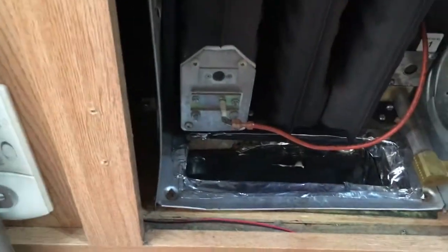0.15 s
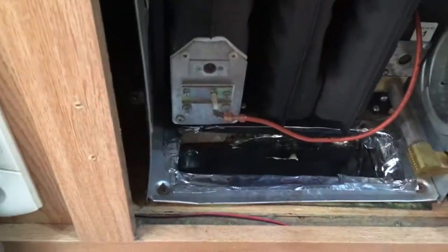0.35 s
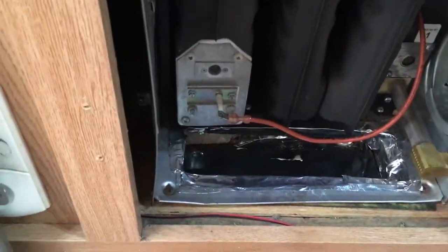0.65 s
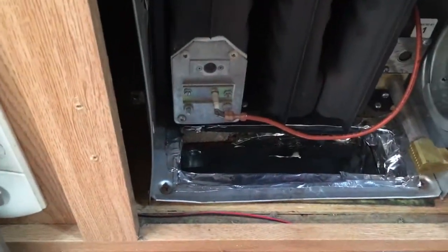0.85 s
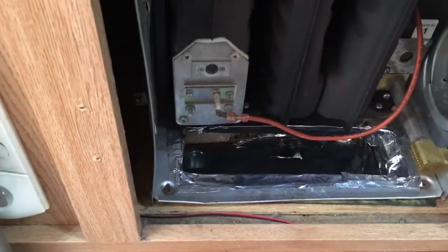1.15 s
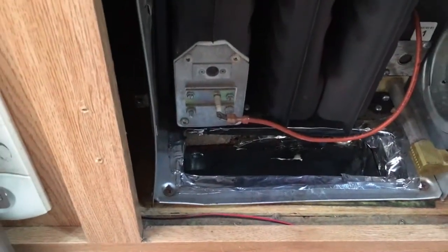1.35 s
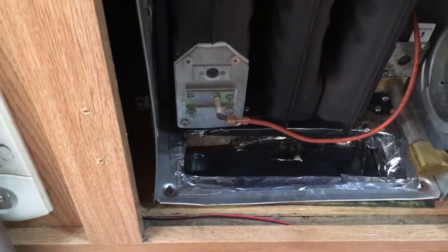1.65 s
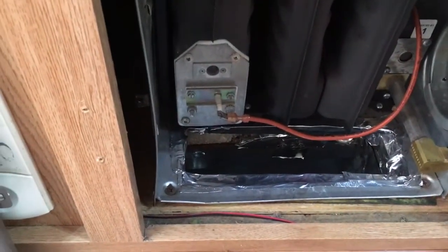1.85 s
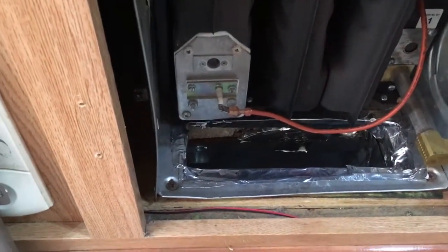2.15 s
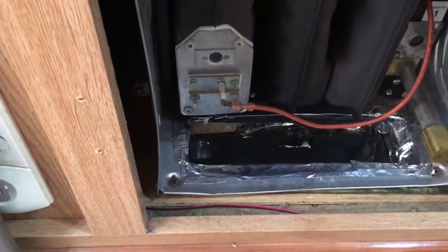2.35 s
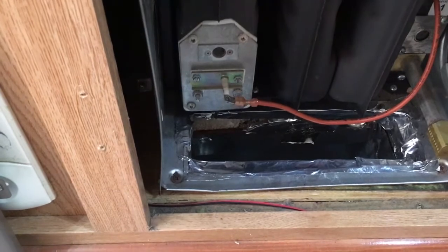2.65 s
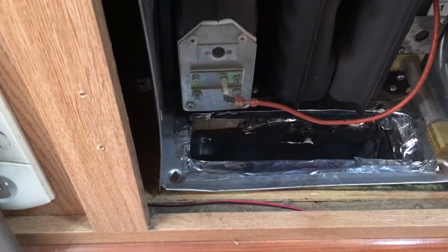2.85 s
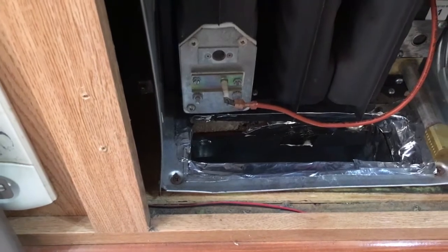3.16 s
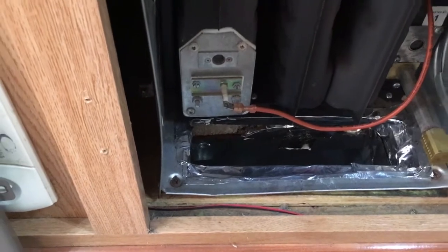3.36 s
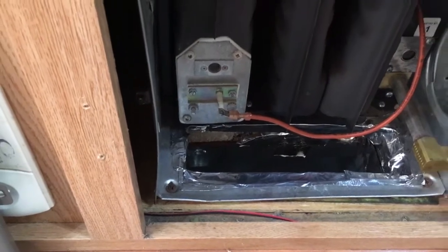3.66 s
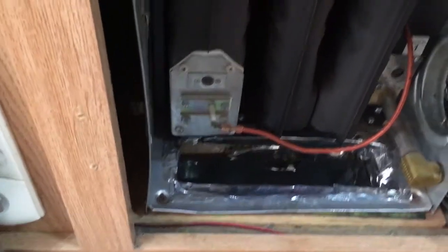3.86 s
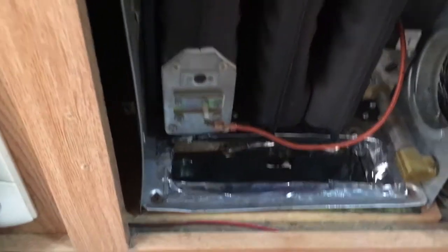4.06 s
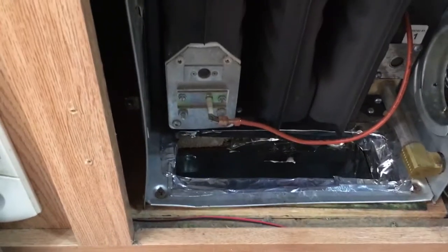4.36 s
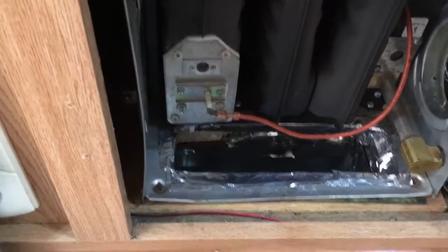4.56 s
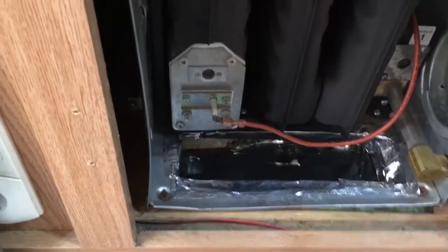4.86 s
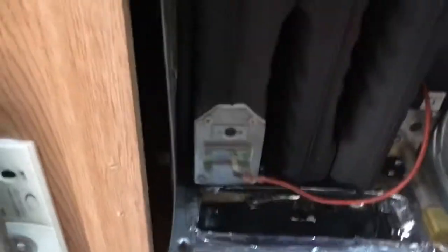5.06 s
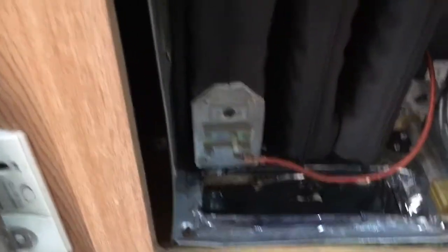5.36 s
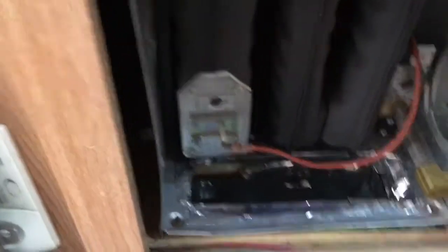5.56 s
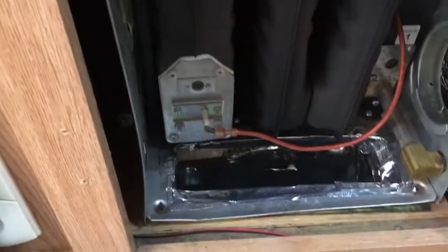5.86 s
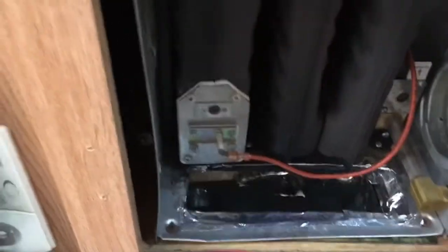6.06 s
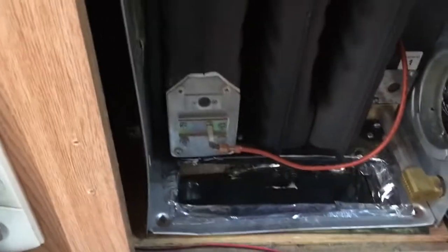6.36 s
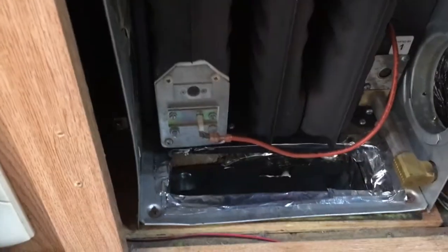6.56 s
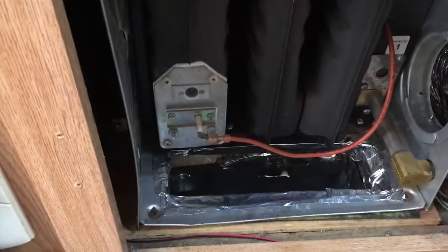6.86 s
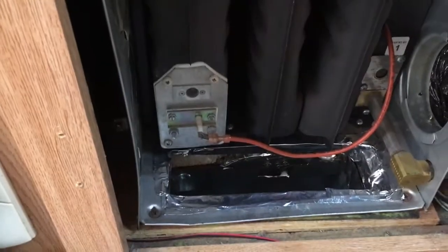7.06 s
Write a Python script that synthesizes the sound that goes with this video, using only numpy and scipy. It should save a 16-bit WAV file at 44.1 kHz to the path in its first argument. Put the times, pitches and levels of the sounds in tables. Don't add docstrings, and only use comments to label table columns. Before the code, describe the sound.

A furnace blower is already at full run and continues without a break for about seven seconds, heard close by in a wooden cabinet of a small vehicle. Air rushes evenly through metal ducts, strongest in the lows and mids, with hollow ringing and soft treble. Beneath it sits a low hum near 28 Hz, with a steady blade tone near 830 Hz. Draught pushes the hand-held microphone in irregular deep thumps and flutter, strong at 0.1, 1.7, 2.4 and 5.9 s. Tiny light clicks fall at about 0.06, 1.4, 2.7, 4.0, 5.4 and 6.7 s. Faint, bright foil ticks are scattered from 0.25 s, clearest at 3.3 and 4.8 s. After 2.4 s the wheel speeds up very slightly, fastest around 3.9 s, dipping briefly near 5.8 s. The hiss fades only slightly as the hand drifts away.

```python
import sys
import numpy as np
from scipy import signal
from scipy.fft import rfft, irfft
from scipy.io import wavfile
from scipy.ndimage import uniform_filter1d

SR = 44100
rng = np.random.default_rng(int(sys.argv[2]) if len(sys.argv) > 2 else 0)


def gain_from_db(level_db):
    decades = np.asarray(level_db, float) / 20
    return 10 ** decades


def pcm_store(signal):
    levels = np.round(np.clip(np.atleast_2d(signal), -1, 1) * 32767)
    wavfile.write(sys.argv[1], SR, levels.astype(np.int16).T)


N = 317726


def rms_one(x):
    return x / np.sqrt(np.mean(x ** 2) + 1e-20)


def in_time(rows):
    s, *columns = np.transpose(rows)
    return [np.interp(np.arange(N) / SR, s, c) for c in columns]


def drift(rate):
    r = np.exp(-80 * np.pi * rate / SR)
    noise = rng.standard_normal(N // 40 + 4002)
    slow = signal.lfilter([1], [1, -2 * r, r * r], noise)[4000:]
    slow = rms_one(slow - slow.mean())
    return np.interp(np.arange(N) / 40, np.arange(len(slow)), slow)


def coloured(spectrum, resonances=()):
    hz = np.arange(N // 2 + 1) * SR / N + 1e-3
    points_hz, points_db = np.transpose(spectrum)
    level_db = np.interp(np.log(hz), np.log(points_hz), points_db, left=-150)
    for centre, width, lift in resonances:
        level_db += lift / (1 + (2 * (hz - centre) / width) ** 2)
    white = rfft(rng.standard_normal(N))
    return white * gain_from_db(level_db) * np.sqrt(SR / 2), hz


def part(spectrum, hz, low_hz, high_hz):
    below_high = 1 / (1 + (hz / high_hz) ** 4)
    below_low = 1 / (1 + (hz / low_hz) ** 4)
    return irfft(spectrum * (below_high - below_low), N)


def evened(x, span_s):
    power = uniform_filter1d(x ** 2, int(span_s * SR))
    return x * np.sqrt(power.mean() / (power + .1 * power.mean()))


def swells(s, peak_db, half_s, calm_db):
    t = np.arange(0, N + 64, 64) / SR
    bell = np.exp(-.5 * ((t - np.asarray(s)[:, None]) / half_s) ** 2)
    power = gain_from_db(2 * calm_db) + gain_from_db(2 * np.asarray(peak_db)) @ bell
    return np.interp(np.arange(N) / SR, t, np.sqrt(power))


# (frequency [Hz], level [dB per Hz])
RUSH_COLOUR = [(170, -69), (300, -68), (450, -71.5), (650, -74), (1150, -77), (1500, -80), (1850, -90.5),
               (2200, -96.5), (3000, -91), (6000, -95), (9850, -99), (10300, -102), (12900, -106),
               (15700, -120)]
# (frequency [Hz], width [Hz], lift [dB])
DUCT_RESONANCES = [(200, 13, -2), (215, 45, 2), (315.3, 47, 4), (383, 34, 4), (417, 34.5, 5.5),
                   (440, 35, -1.5), (495, 19, 5.5), (533, 37, 6.5), (591, 32, -0.5), (868, 44, 5.5),
                   (909, 16, 8), (942, 42, 1.5), (1021, 81, 6), (1130, 26, -1.5), (1299, 145, 6.5),
                   (1403, 44, 3), (1723, 41, 4), (2115, 50, 3.5), (2360, 84, 4), (2530, 48, 6.5),
                   (2727, 127, 6), (3460, 84, 3.5), (3850, 130, 5), (4520, 120, 1.5), (5000, 200, 3),
                   (5500, 120, 0), (8100, 80, 2)]


def rush(eddy_db, top_eddy_db):
    spectrum, hz = coloured(RUSH_COLOUR, DUCT_RESONANCES)
    fade_db_per_s = 0.08
    hiss_db = -fade_db_per_s * (np.arange(N) - N / 2) / SR
    edges = 20 * 2.0 ** np.arange(12)
    shared = drift(12)
    out = 0
    for low, high in zip(edges, edges[1:]):
        depth_db = top_eddy_db if low > 9000 else eddy_db
        flow_db = 0 if low < 1500 else hiss_db
        flicker = 0.19 * shared + 1.3 * drift(3.2)
        out = out + part(spectrum, hz, low, high) * gain_from_db(flow_db + depth_db * flicker)
    return out


# (time [s], blade tone [Hz])
WHEEL_SPEED = [
    (0, 827.4),
    (2.4, 827.5),
    (2.8, 828.5),
    (3.9, 829.6),
    (5.1, 829.3),
    (5.8, 828.3),
    (7.2, 829.3),
]
# (multiple of shaft speed [-], level [dB rms])
SHAFT_HUM = [(1, -45), (6, -62), (7, -60), (8, -53), (11, -60), (12, -59), (13, -55), (14, -54.5),
             (17, -64), (19, -60), (20, -53.5), (21, -53), (22, -58.5), (23, -65), (24, -66), (25, -60),
             (26, -67), (27, -66), (28, -58), (29, -53.5), (30, -48.5), (32, -61), (33, -60), (37, -62),
             (40, -69), (45, -68), (62, -77)]


def wheel(waver_db):
    blades = 30
    shaft_hz = in_time(WHEEL_SPEED)[0] / blades
    turn = 2 * np.pi * np.cumsum(shaft_hz) / SR
    out = 0
    for multiple, level_db in SHAFT_HUM:
        phase = multiple * turn + rng.uniform(0, 2 * np.pi)
        level = np.sqrt(2) * gain_from_db(level_db + waver_db * drift(0.71))
        out = out + level * np.sin(phase)
    return out


# (frequency [Hz], level [dB per Hz])
DRAUGHT_COLOUR = [(1, -45), (3.5, -28), (9, -26.5), (14, -36.5), (25, -46), (40, -50), (70, -58),
                  (120, -61.5), (170, -67.5), (300, -94.5)]
# (time [s], level [dB])
SWAY_STRENGTH = [(0, -16), (.27, -25), (.45, -21), (.68, -30), (.95, -23), (1.19, -28.5), (1.6, -16.5),
                 (2.2, -14.5), (2.65, -22), (2.99, -14.5), (3.46, -21.5), (3.7, -18.5), (4.1, -24.5),
                 (4.82, -17), (5.64, -22), (5.97, -15.5), (6.23, -24), (6.65, -13.5)]
# (time [s], push level [dB], flutter level [dB])
GUSTS = [(0.08, -20.5, -39), (0.48, -34, -53), (0.67, -27.5, -38), (0.99, -26, -38.5), (1.38, -30, -36.5),
         (1.67, -20.5, -39), (1.88, -40, -36), (2.06, -40, -42), (2.23, -30, -39), (2.41, -23.5, -44),
         (2.55, -28, -39), (2.74, -27, -43), (2.92, -26, -39), (3.16, -37, -38.5), (3.57, -27, -40.5),
         (4.07, -26, -35), (4.37, -27, -45), (4.55, -28, -54), (4.66, -31, -38), (4.89, -35, -42),
         (5.09, -26, -47), (5.47, -38, -41), (5.9, -24, -41), (6.11, -45, -40), (6.62, -30, -44),
         (6.75, -32, -44), (7.13, -38, -40)]


def draught():
    spectrum, hz = coloured(DRAUGHT_COLOUR)
    s, push_db, flutter_db = np.transpose(GUSTS)
    sway_depth = 0.9
    sway_db = sway_depth * (in_time(SWAY_STRENGTH)[0] + 21) - 1.5
    sway = evened(part(spectrum, hz, 1.5, 15), .4) * gain_from_db(sway_db)

    push = swells(s, push_db, half_s=0.044, calm_db=-36)
    gusts = evened(part(spectrum, hz, 15, 60), .08) * gain_from_db(31) * push

    flap = swells(s, flutter_db, half_s=0.023, calm_db=-41.5)
    flutter = evened(part(spectrum, hz, 60, 2000), .08) * gain_from_db(41) * flap
    return .42 * np.tanh((sway + gusts) / .42) + flutter


# (time [s], peak level [dB])
FOIL_TICKS = [(0.2544, -54), (0.9994, -55), (1.5694, -56), (1.6194, -56), (2.4394, -58), (3.1594, -55),
              (3.1994, -58), (3.3228, -47), (3.9968, -56), (4.7681, -55), (4.801, -50), (5.1901, -55),
              (5.5754, -57), (6.8094, -55.5), (6.8394, -56), (6.9745, -54), (6.9944, -55)]


def foil(crinkle_s, low_hz, lift_db, flecks_per_s, fleck_db):
    flecks = rng.random(N) < flecks_per_s / SR
    shape = flecks * gain_from_db(fleck_db + rng.normal(0, 2.5, N))
    for s, peak_db in FOIL_TICKS:
        shape[round(s * SR)] = gain_from_db(peak_db + lift_db)
    shape = signal.lfilter([1], [1, -np.exp(-1 / (crinkle_s * SR))], shape + 1e-18)
    bright = signal.butter(2, [low_hz, 15500], "band", fs=SR, output="sos")
    return signal.sosfilt(bright, shape * rng.standard_normal(N))


LOSS_FIRST, LOSS_EVERY = 2761.6, 58429.4
LOSS_PRESSURE = [
    -.31,
    .135,
    -.13,
    -.035,
    -.06,
    .125,
]


def scene():
    hum = wheel(waver_db=1.28)
    ticks = foil(crinkle_s=0.0037, low_hz=9500, lift_db=-3, flecks_per_s=14, fleck_db=-63)
    air = rush(eddy_db=0.5, top_eddy_db=0.9) + hum + draught() + ticks

    centres = [8, *LOSS_FIRST + LOSS_EVERY * np.arange(len(LOSS_PRESSURE))]
    pressures = [.142, *LOSS_PRESSURE]
    for centre, pressure in zip(centres, pressures):
        push = np.exp(-.5 * ((np.arange(N) - centre) / (.018 * SR)) ** 2)
        air = air + (pressure - uniform_filter1d(air, 900)) * push
        here = air[int(centre) - 8:int(centre) + 8].mean()
        air = air + (pressure - here) * push
    return air[None]


def low_pass(x):
    return signal.sosfilt(signal.butter(12, 15710, fs=SR, output="sos"), x)


def record(dry):
    off_centre = (np.arange(N) - LOSS_FIRST + LOSS_EVERY / 2) % LOSS_EVERY - LOSS_EVERY / 2
    band = 2 * 16500 / SR
    lost = sum(band * np.sinc(band * (off_centre - k)) for k in (-1, 0, 1))
    lost = lost * np.exp(-.5 * (off_centre / 20) ** 2)
    mix = dry * (1 - lost)
    return low_pass(mix)


dry = scene()
out = record(dry)
pcm_store(out)
```